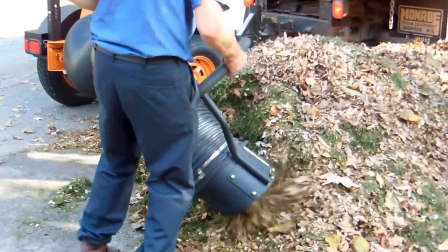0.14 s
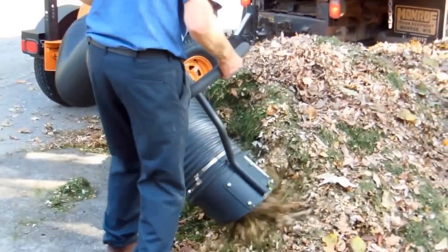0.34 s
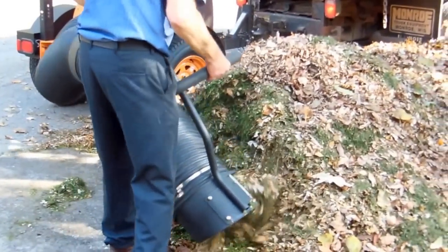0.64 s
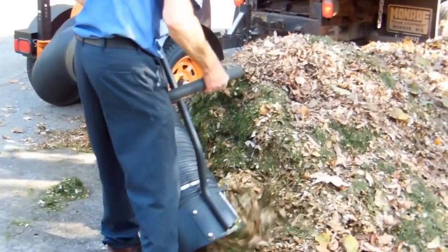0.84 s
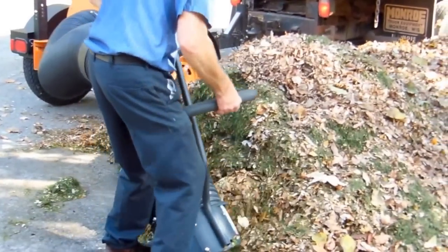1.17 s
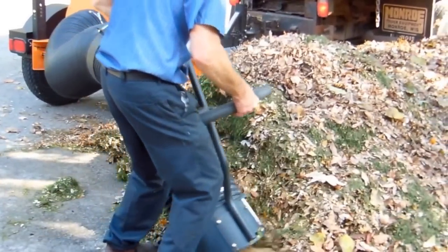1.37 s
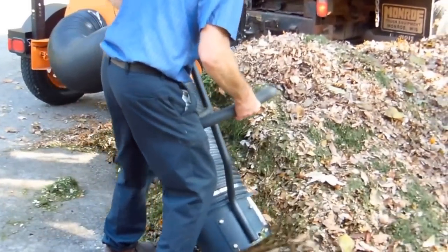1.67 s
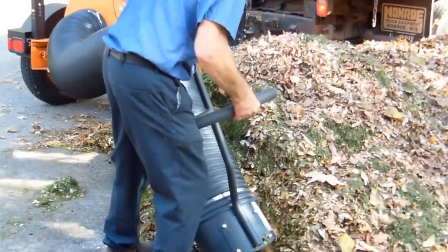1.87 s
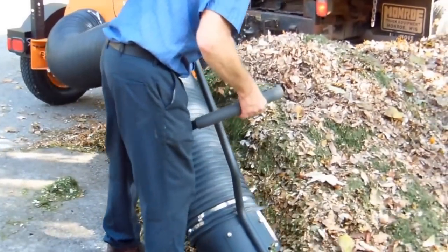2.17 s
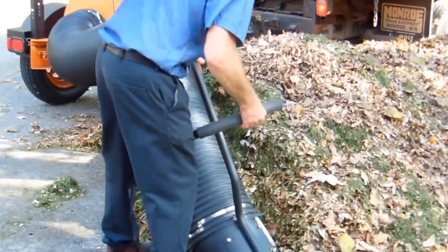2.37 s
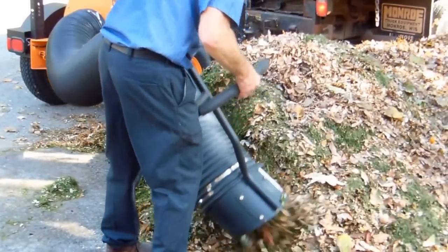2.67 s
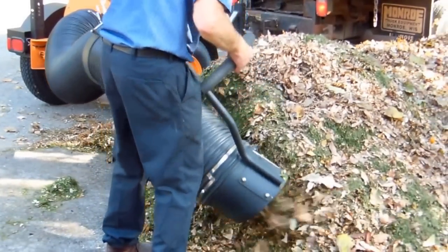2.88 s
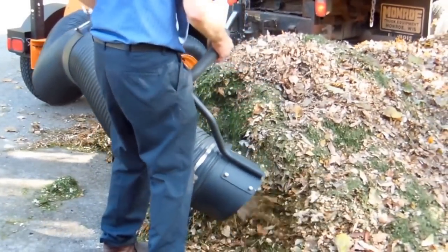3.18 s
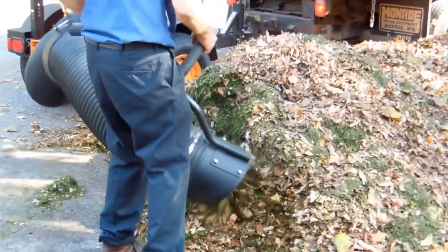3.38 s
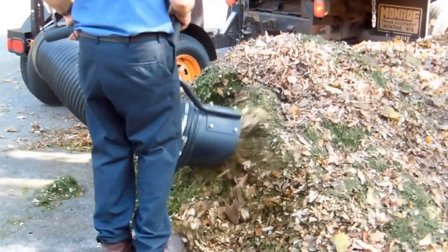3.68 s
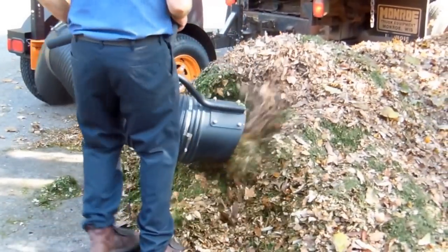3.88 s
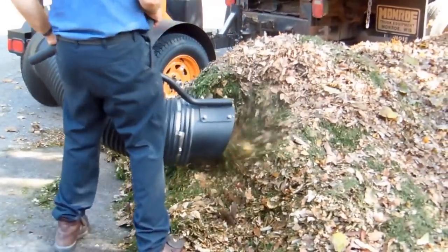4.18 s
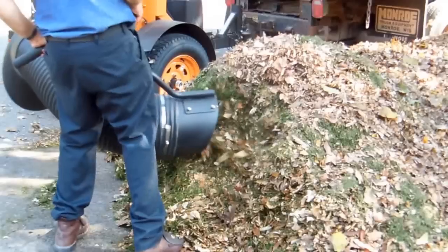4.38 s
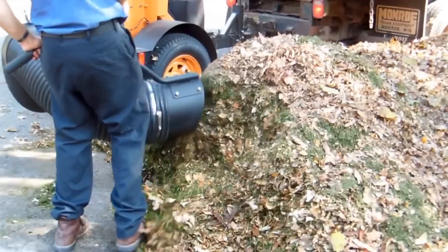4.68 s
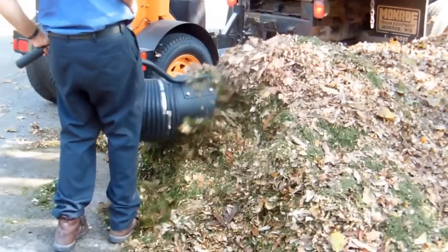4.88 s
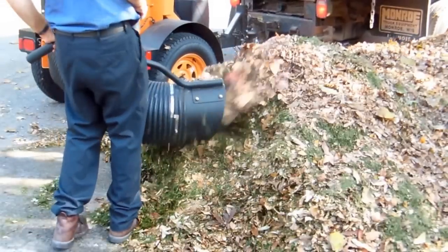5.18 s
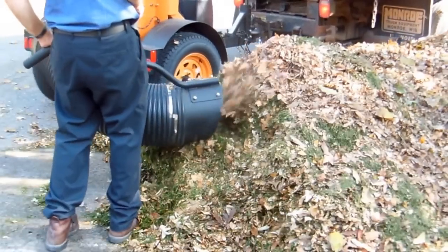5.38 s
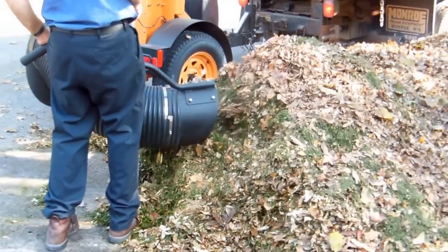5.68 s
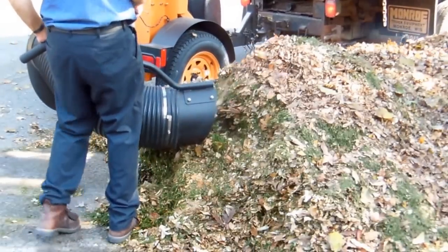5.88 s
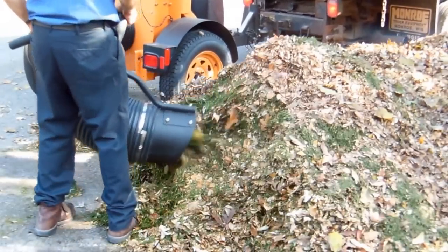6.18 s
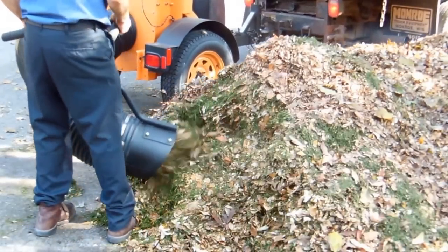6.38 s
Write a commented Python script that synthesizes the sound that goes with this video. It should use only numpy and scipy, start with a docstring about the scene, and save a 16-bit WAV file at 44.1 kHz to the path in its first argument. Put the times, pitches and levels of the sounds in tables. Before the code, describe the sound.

An engine-driven vacuum loader runs outdoors for about six and a half seconds. Its fan hums a strong, low note over a thudding, growling exhaust, while air roars and dry leaves hiss and scrape up a wide hose. Twigs tick sharply on the nozzle throughout. At about 0.9 seconds a clump gulps in and knocks the steel housing; the pitch sags, recovering by 2 seconds, when a lighter knock follows. The fan note is strongest from about 1.2 to 3.5 seconds, then recedes as the rushing grows from 4 seconds. Gulps of leaves surge between 4.8 and 6.1 seconds, with hard metal knocks near 4.9, 5.9 and 6 seconds and louder twig cracks. The engine dips again around 6 seconds, then starts to climb as the fan note returns. Low wind buffets the microphone in the background.

```python
"""Outdoors, an engine-driven vacuum loader sucks leaves up a wide hose.
A four-blade fan on the engine shaft sings as its blades pass, and its pitch sags when clumps load it.
The exhaust thuds and growls below, air and leaves rush in the hose, clumps knock the steel housing
and twigs tick on the nozzle. Wind buffets the microphone in the background."""
import sys
import numpy as np
from scipy import signal
from scipy.fft import rfft, irfft, next_fast_len
from scipy.io import wavfile

SR = 44100
rng = np.random.default_rng(int(sys.argv[2]) if len(sys.argv) > 2 else 0)


def inscribe(sig):
    """Save sig as 16-bit PCM at rate SR to the path in sys.argv[1].

    A 1-D sig is mono; a 2-D sig holds one channel per row.
    Samples are clipped to [-1, 1] before scaling.
    """
    pcm = np.round(np.clip(np.atleast_2d(sig).T, -1, 1) * 32767)
    wavfile.write(sys.argv[1], SR, pcm.astype(np.int16))


N = 288414


def amp(db):
    """Turn decibels into a number to multiply by."""
    return 10 ** (np.asarray(db) / 20)


def rms_one(x):
    """Scale a signal to an average strength (rms) of 1."""
    return x / np.sqrt(np.mean(x ** 2) + 1e-20)


def in_time(rows):
    """Join a table's points with straight lines: one curve for each column after the time."""
    times, *columns = np.transpose(rows)
    return [np.interp(np.arange(N) / SR, times, column) for column in columns]


def at_hz(points, hz):
    """Read a table at any pitch, giving each octave equal room."""
    pitches, values = np.transpose(points)
    return np.interp(np.log(hz), np.log(pitches), values)


def drift(rate_hz):
    """A smooth random wander of about 1 either way; a higher rate moves faster."""
    step = 40   # samples between points
    keep = np.exp(-2 * np.pi * step * rate_hz / SR)
    noise = rng.standard_normal(N // step + 2002)
    slow = signal.lfilter([1], [1, -2 * keep, keep * keep], noise)[2000:]   # skip the warm-up
    return np.interp(np.arange(N) / step, np.arange(len(slow)), rms_one(slow))


# How alike the two ears are (1 is the same): pitch_hz, likeness
EAR_LIKENESS = [(100, 1), (500, 0.98), (1000, 0.98), (2300, 1), (4300, 0.82), (8000, 0.6), (13000, 0.51)]
# How much louder the left ear is: pitch_hz, left_minus_right_db
EAR_BALANCE = [(30, -12), (200, -2), (1000, 0), (4000, -0.6), (10000, -2.5)]
# How far the left ear's wave runs ahead: pitch_hz, lead_radians
EAR_LEAD = [(100, 0.22), (6000, 0.08), (12600, 0.75), (14700, 0.65)]
def fluttering_noise(spectrum, flutter_db, rate_hz, unrelated=False):
    """Stereo noise shaped by a spectrum, its level fluttering; unrelated gives each ear its own."""
    white = rng.standard_normal((2, N)) * amp(flutter_db * drift(rate_hz))
    size = next_fast_len(N, real=True)
    hz = np.maximum(np.fft.rfftfreq(size, 1 / SR), 1)
    mid, side = rfft(white, size)
    left_right = np.array([[1], [-1]])
    alike = 0 if unrelated else at_hz(EAR_LIKENESS, hz)
    ears = np.sqrt(1 + alike) * mid + np.sqrt(1 - alike) * side * left_right
    balance = amp(at_hz(EAR_BALANCE, hz) / 2 * left_right)
    lead = np.exp(.5j * at_hz(EAR_LEAD, hz) * left_right)
    inside = (hz > spectrum[0][0]) & (hz < spectrum[-1][0])
    colour = inside * amp(at_hz(spectrum, hz))
    return rms_one(irfft(ears * balance * lead * colour, size)[:, :N])


# How strong the wind is: time_s, level_db
WIND_LEVELS = [(0, -31), (.9, -32), (1.6, -32), (2.0, -39), (3.3, -41), (4.0, -33), (4.8, -27), (5.4, -38),
               (6.2, -29), (6.54, -31)]
# The wind's low tone colour: pitch_hz, level_db
WIND_SPECTRUM = [(15, -16), (25, -32), (50, 4), (170, -4), (250, -4), (400, -17), (700, -37)]
def wind():
    """Wind on the microphone makes lumpy low noise, different in each ear."""
    gusts = amp(in_time(WIND_LEVELS)[0] + 2 * drift(3.7))
    return gusts * fluttering_noise(WIND_SPECTRUM, flutter_db=1, rate_hz=18, unrelated=True)


# Twigs hitting the nozzle: start_s, relative_level_db, pitch_hz, fade_s (time to drop 60 dB)
TWIG_HITS = [(0.0772, -18, 11500, .05), (0.3172, -18, 11800, .05), (0.4894, -16, 11500, .05),
             (1.1293, -16.5, 12530, .05), (1.5928, -18, 4510, 0.15), (1.8205, -17, 11200, .1),
             (1.9345, -18, 11200, .05), (2.4937, -17.5, 4660, 0.067), (2.811, -12.5, 11400, 0.14),
             (2.9604, -17, 11000, .07), (2.9996, -15, 12100, .05), (3.119, -14.5, 8600, 0.03),
             (3.258, -18, 10000, .06), (3.3282, -18, 12500, .08), (3.495, -18, 5000, .06),
             (3.5488, -18, 3100, 0.079), (4.0719, -16, 3600, .05), (4.9516, -12, 9240, .05),
             (5.3676, -8, 12600, .06), (5.779, -8.5, 10110, 0.059), (6.3884, -6, 7050, 0.12),
             (6.4693, -17, 7100, .05)]
def twig_ticks():
    """Each twig gives a sharp crack, then a bright crunch around its pitch that dies fast."""
    out = np.zeros((2, N))
    for start_s, level_db, pitch_hz, fade_s in TWIG_HITS:
        start = round(start_s * SR)
        t = np.arange(min(SR // 4, N - start)) / SR
        shared, own = rng.standard_normal((2, 2, SR // 4))[..., :len(t)]
        edges_hz = [pitch_hz / 1.6, min(pitch_hz * 1.6, .45 * SR)]
        band = signal.butter(1, edges_hz, "band", fs=SR, output="sos")
        noise = rms_one(signal.sosfilt(band, shared[0] + .21 * own))   # nearly alike in both ears
        crack = .66 * np.exp(-t / .002)
        crunch = .78 * amp(-60 * t / fade_s)
        out[:, start:start + len(t)] += amp(level_db - 8) * (crack + crunch) * noise
    return out


# Gulps of leaves: peak_s, swell_db, rise_s
LEAF_GULPS = [(.55, 2, .04), (.71, 1, 0.058), (.87, 8, 0.039), (2.16, 2, 0.06), (2.5, 2.5, 0.095),
              (3.37, 5, 0.053), (3.57, 2, .06), (4.0, 3.5, 0.037), (4.08, 3, 0.018), (4.48, 3, 0.14),
              (4.86, 6.5, 0.036), (4.95, 3, 0.015), (5.39, 5.5, .04), (5.5, 6.5, 0.034), (5.79, 3, 0.11),
              (5.87, 9.5, 0.036), (6.05, 4, .05)]
def gulp_swell_db(fall_s=.065):
    """Each gulp briefly lifts the level: it rises in its own time, and all take fall_s to drop."""
    t = np.arange(N) / SR
    return sum(np.interp(t, [peak_s - rise_s, peak_s, peak_s + fall_s], [0, swell_db, 0])
               for peak_s, swell_db, rise_s in LEAF_GULPS)


# The flow in the hose, before gulps are added: time_s, roar_db, rush_db, scrape_db
HOSE_FLOW = [(0, -35, -38, -35.5), (.14, -31, -39, -31), (.7, -26.5, -30, -28), (.92, -29.5, -32.5, -32),
             (1.0, -30, -36.5, -33), (1.1, -30.5, -36.5, -32), (1.78, -31.5, -34, -34),
             (1.84, -31, -35, -29), (2.2, -31, -33, -32.5), (2.4, -33.5, -36.5, -33.5),
             (3.02, -34, -38.5, -31.5), (3.2, -33, -38, -34.5), (3.9, -30, -35.5, -33),
             (4.1, -26.5, -32.5, -30.5), (4.5, -25, -30, -27), (5.08, -26, -31, -27),
             (5.45, -22.5, -28.5, -24.5), (5.75, -22.5, -29.5, -25.5), (5.97, -25.5, -31.5, -28),
             (6.54, -28, -34.5, -32.5)]
# Tone colour of the roaring air: pitch_hz, level_db
AIR_ROAR = [(120, 7.5), (250, -5), (420, -1.5), (520, -0.5), (720, -4.5), (870, -1.5), (1000, -1.5),
            (1150, -8), (1350, -5), (2000, -8), (2250, -5.5), (2700, -5.5), (3300, -9), (4500, -18.5)]
# Tone colour of the rushing leaves: pitch_hz, level_db
LEAF_RUSH = [(1500, -40), (3000, -4), (4000, 2), (5000, 2.5), (6300, 2), (7500, 0), (10000, -4.5),
             (14600, -30.5)]
# Tone colour of the scraping at the nozzle: pitch_hz, level_db
NOZZLE_SCRAPE = [(5000, -9), (7500, -4), (8100, -2), (8300, 2), (8500, -1.5), (9500, 2), (10500, 1),
                 (11300, 3.5), (11800, 2.5), (13000, 0), (14500, -4.5)]
# Tone colour of the rumble underneath: pitch_hz, level_db
LOW_RUMBLE = [(20, -62), (60, -7), (100, 1.5), (200, -2), (260, -5), (500, -21)]
def hose(cycle):
    """Air and leaves pour up the hose; the roar and rush throb with each firing and shaft turn."""
    roar_db, rush_db, scrape_db = in_time(HOSE_FLOW) + gulp_swell_db() * [[.5], [1], [.66]]
    throb_db = .7 * np.sin(2 * cycle) + .5 * np.sin(cycle)
    rumble_db = -33.5 + .037 * (roar_db - roar_db.mean())
    roar = amp(roar_db + throb_db) * fluttering_noise(AIR_ROAR, flutter_db=.86, rate_hz=16)
    rush = amp(rush_db + throb_db) * fluttering_noise(LEAF_RUSH, flutter_db=1, rate_hz=14)
    scrape = amp(scrape_db) * fluttering_noise(NOZZLE_SCRAPE, flutter_db=1.5, rate_hz=46)
    rumble = amp(rumble_db) * fluttering_noise(LOW_RUMBLE, flutter_db=2, rate_hz=13)
    return roar + rush + scrape + rumble


def random_clicks(length, per_second):
    """Clicks of random strength at random moments."""
    return rng.standard_normal(length) * (rng.random(length) < per_second / SR)


def ring(clicks, pitch_hz, fade_s):
    """Each click starts a pure tone that drops 60 dB in fade_s."""
    keep = amp(-60 / (fade_s * SR))
    angle = 2 * np.pi * pitch_hz / SR
    return signal.lfilter([0, np.sin(angle)], [1, -2 * keep * np.cos(angle), keep * keep], clicks + 1e-18)


# Clumps flying into the fan: start_s, relative_level_db, contact_ms (longer is duller)
CLUMP_HITS = [(0.895, 0, 0.42), (2.135, -10, 0.27), (4.07, -18, .2), (4.85, 0, .25), (5.387, -12, .2),
              (5.495, -12, .2), (5.865, 0, 0.18), (6.031, -3, 0.19)]
# The notes the steel housing rings at: pitch_hz, level_db, fade_s
STEEL_NOTES = [(200, -14, .05), (512, -18, .4), (640, -15, .05), (856, -12, .08), (950, -13, .06),
               (1290, -19, .04), (1544, -21, .04), (2240, -18, .06), (2526, -20, .05), (3100, -23, .03)]
def housing_knocks():
    """A clump rings the steel with one hard knock and many light ones; grit pings along with the roar."""
    roar_db = in_time(HOSE_FLOW)[0] + .5 * gulp_swell_db()
    grit = amp(roar_db + 14.5) * random_clicks(N, per_second=250)
    hits = np.diff(grit, prepend=0)   # light grit hardly stirs the low notes
    t = np.arange(SR // 8) / SR
    for start_s, level_db, contact_ms in CLUMP_HITS:
        knocks = .17 * random_clicks(len(t), per_second=700) * np.exp(-t / .03)
        knocks[0] = .7   # the hard knock
        softness = np.exp(-1000 / (contact_ms * SR))
        softened = signal.lfilter([1 - softness], [1, -softness], knocks)
        hits[round(start_s * SR):][:len(t)] += amp(level_db + 1) * softened
    return sum(amp(level_db) * ring(hits, pitch_hz, fade_s) for pitch_hz, level_db, fade_s in STEEL_NOTES)


def engine_tones(cycle, tones, waver_db, slip_radians, lag_radians=0):
    """Wavering pure tones at multiples of the firing rate; several nearly in step add up to pulses."""
    out = np.zeros(N)
    for multiple, level_db in tones:
        strength = amp(level_db + waver_db * drift(6))
        phase = multiple * cycle - lag_radians * multiple ** 2 + slip_radians * drift(2)
        out += strength * np.cos(phase)
    return out * np.sqrt(2)


# The exhaust's low tones: firing_rate_multiple, level_db
THUD_TONES = [(1, -8), (2, 0.5), (3, -7.5), (4, -12.5)]
# The exhaust's higher tones: firing_rate_multiple, level_db
GROWL_TONES = [(5, -2), (6, -3), (7, -8), (9, -16), (10, -16.5), (11, -12), (12, -33), (13, -12),
               (14, -21.5), (17, -23), (18, -18), (19, -27.5), (21, -20), (27, -27)]
def exhaust(cycle, blade_hz, free_blade_hz=220):
    """Exhaust pulses grow with the flow in the hose and as the load drags the shaft down."""
    roar_db = in_time(HOSE_FLOW)[0]
    flow_db = roar_db - roar_db.mean()
    sag_hz = free_blade_hz - blade_hz
    thud_db = -26.5 + .2 * flow_db + .08 * sag_hz + drift(3.3)
    growl_db = -29 + .87 * flow_db + .106 * sag_hz + 1.5 * drift(2.8)
    # the lag is the muffler smearing each pulse
    thud = engine_tones(cycle, THUD_TONES, waver_db=.8, slip_radians=.2, lag_radians=.15)
    growl = engine_tones(cycle, GROWL_TONES, waver_db=1.1, slip_radians=.25, lag_radians=.15)
    return amp(thud_db) * thud + amp(growl_db) * growl


# The fan's note, changing as the nozzle is turned and covered: time_s, note_db, octave_db
FAN_LEVELS = [(0, -18, -37.5), (.35, -17.5, -56), (.62, -16, -35), (.77, -10.5, -38.5), (.9, -14, -32.5),
              (.99, -18, -34), (1.05, -13.5, -35), (1.22, -10.5, -39), (1.55, -8.5, -39),
              (1.98, -12.5, -37.5), (2.1, -11.5, -35.5), (2.3, -8, -39), (2.42, -11, -44), (2.53, -9, -36),
              (2.64, -11, -33.5), (2.8, -9, -33.5), (3.08, -12.5, -46), (3.3, -13.5, -43.5),
              (3.43, -10, -36.5), (3.63, -14.5, -38), (3.9, -24, -38), (4.1, -23, -34),
              (4.45, -21.5, -30.5), (4.68, -14, -34), (4.9, -25.5, -33), (5.06, -32, -36.5),
              (5.25, -28.5, -31), (5.45, -28.5, -25.5), (5.61, -44, -42), (5.83, -20, -42),
              (6.05, -25, -31), (6.2, -20.5, -34), (6.36, -12.5, -36), (6.54, -14, -39.5)]
def fan(cycle):
    """Passing blades sing one note, with fainter tones at two and three times its pitch."""
    note_db, octave_db = in_time(FAN_LEVELS)
    note = engine_tones(cycle, [(8, 0)], waver_db=.4, slip_radians=.1)
    octave = engine_tones(cycle, [(16, 0)], waver_db=2, slip_radians=.44)
    top = engine_tones(cycle, [(24, -35)], waver_db=2.5, slip_radians=.4)
    return amp(note_db) * (note + top) + amp(octave_db) * octave


# How fast the blades pass, sagging under load: time_s, blade_hz
BLADE_RATE = [(0, 216), (.4, 218), (.57, 215), (.77, 204), (.88, 202), (.94, 190), (1.02, 191), (1.2, 198),
              (1.4, 202), (1.65, 210.6), (1.98, 212), (2.25, 207.5), (2.53, 209), (2.7, 212.5), (2.97, 213),
              (3.2, 218.5), (3.55, 218), (3.85, 223), (4.4, 224), (4.8, 217.5), (4.97, 212), (5.28, 221.5),
              (5.65, 220), (5.83, 213.7), (6.05, 196.8), (6.2, 196.5), (6.54, 207)]
def scene():
    """One shaft times the fan, exhaust and hose throb; the machine sits just right of the middle."""
    blade_hz, = in_time(BLADE_RATE)
    # the firing cycle in radians: four blades and two turns make eight passes per firing
    cycle = 2 * np.pi * np.cumsum(blade_hz / 8) / SR
    machine = exhaust(cycle, blade_hz) + fan(cycle) + housing_knocks()
    return machine * amp([[-.4], [.4]]) + hose(cycle) + twig_ticks() + wind()


def record(dry):
    """Round off the loudest peaks and cut the highest treble."""
    rounded = 2 * np.tanh(dry / 2)
    treble_cut = signal.ellip(12, .5, 85, 14200, fs=SR, output="sos")
    return signal.sosfilt(treble_cut, rounded)


dry = scene()
out = record(dry)
inscribe(out)
```